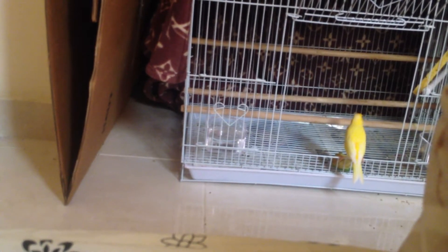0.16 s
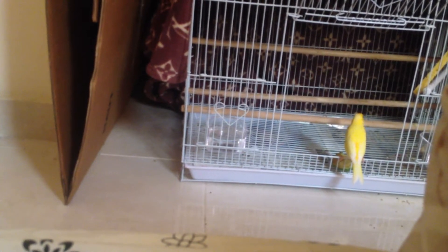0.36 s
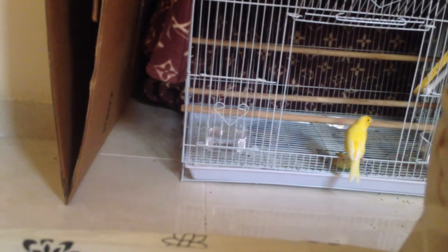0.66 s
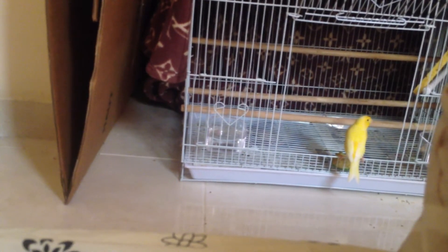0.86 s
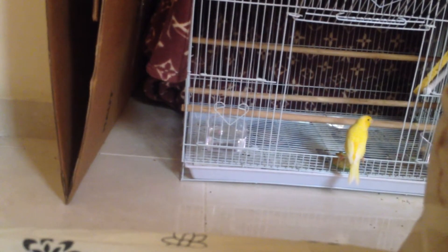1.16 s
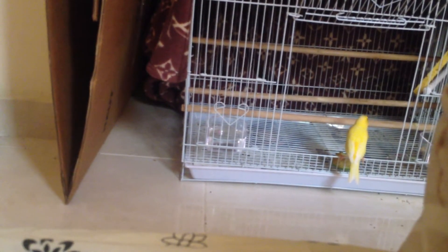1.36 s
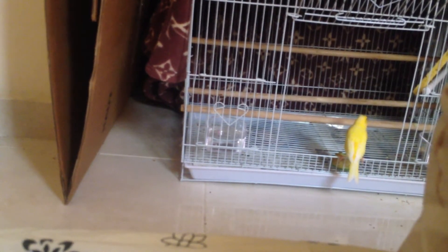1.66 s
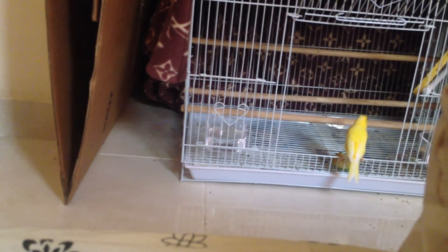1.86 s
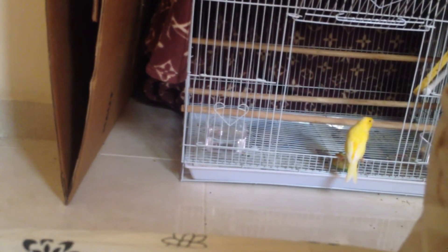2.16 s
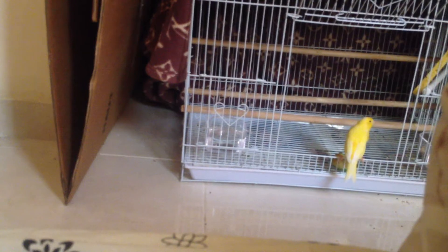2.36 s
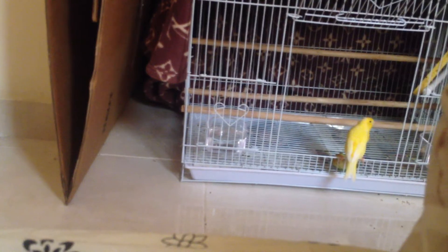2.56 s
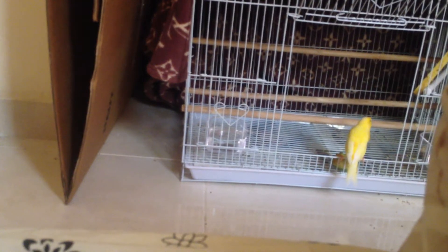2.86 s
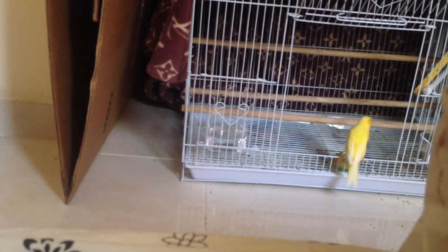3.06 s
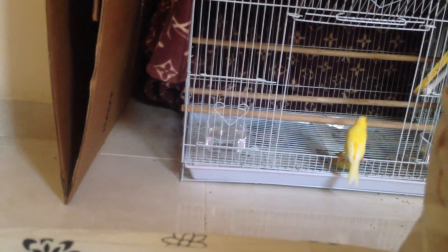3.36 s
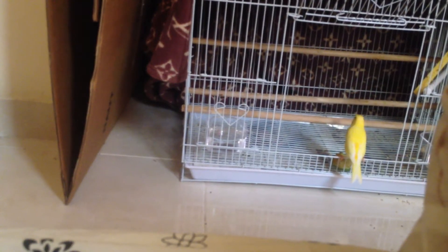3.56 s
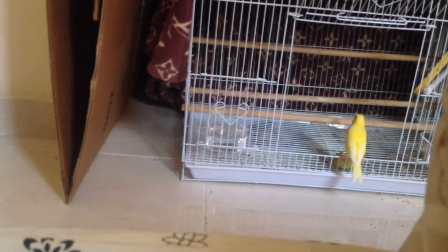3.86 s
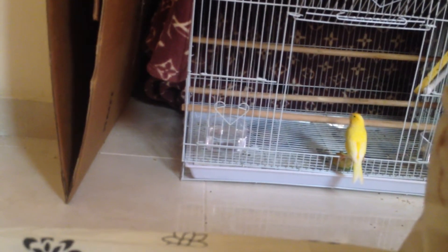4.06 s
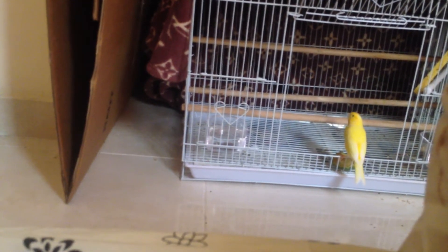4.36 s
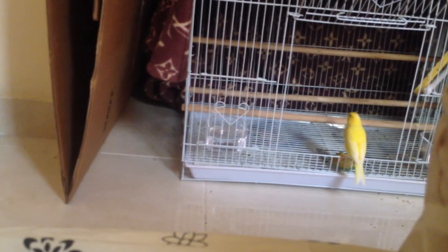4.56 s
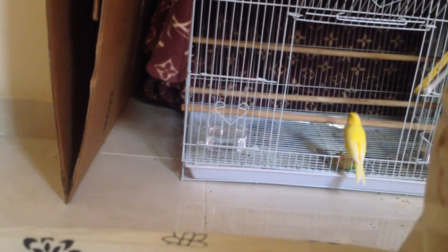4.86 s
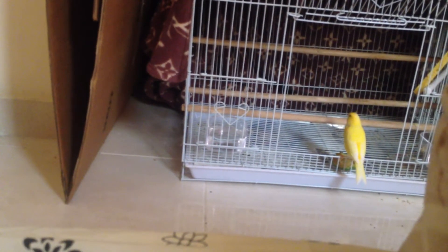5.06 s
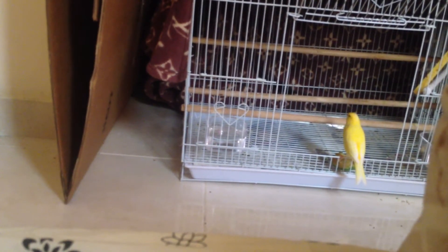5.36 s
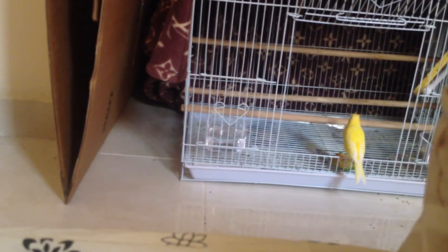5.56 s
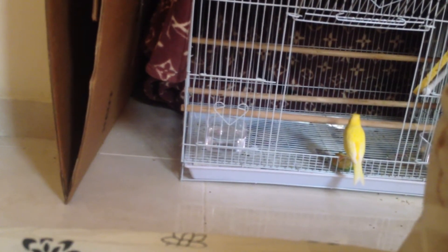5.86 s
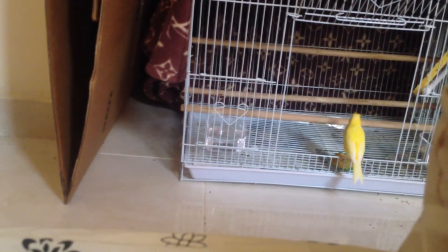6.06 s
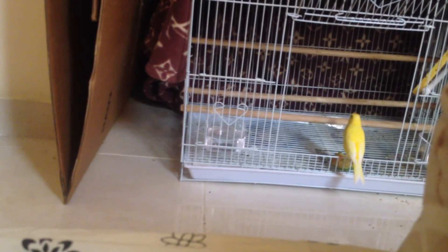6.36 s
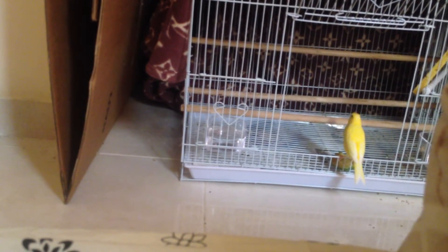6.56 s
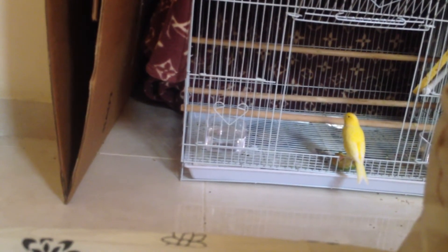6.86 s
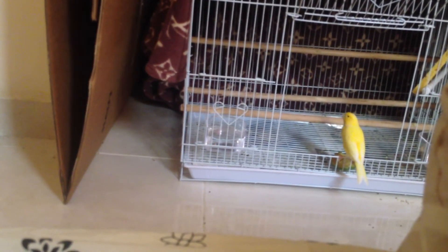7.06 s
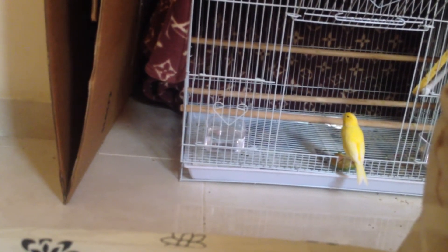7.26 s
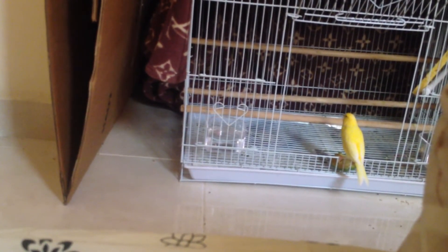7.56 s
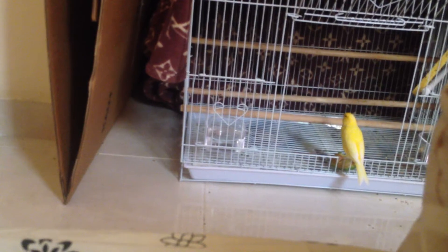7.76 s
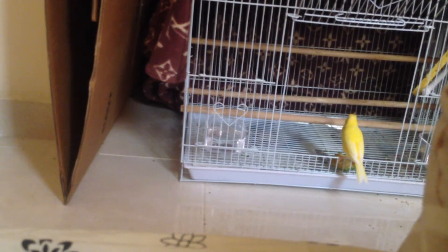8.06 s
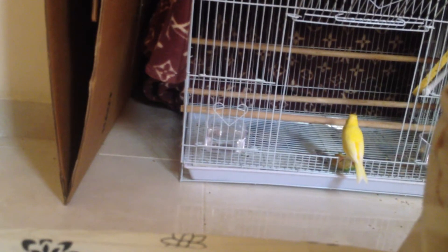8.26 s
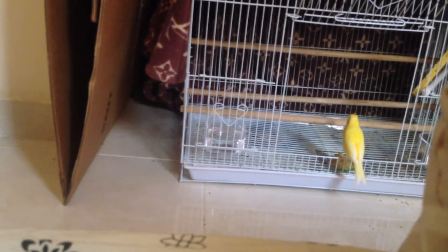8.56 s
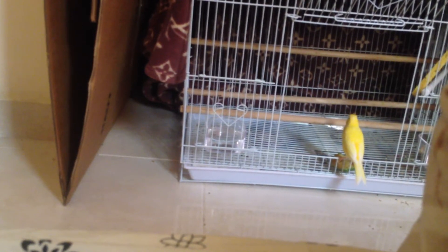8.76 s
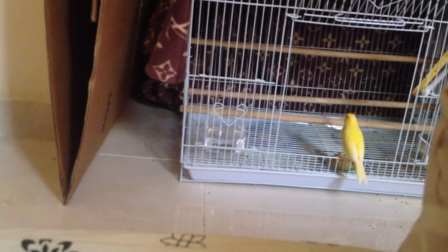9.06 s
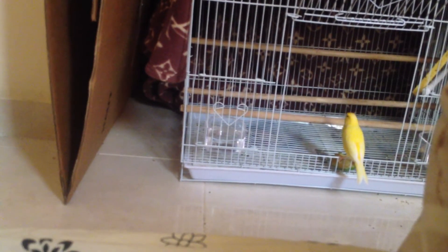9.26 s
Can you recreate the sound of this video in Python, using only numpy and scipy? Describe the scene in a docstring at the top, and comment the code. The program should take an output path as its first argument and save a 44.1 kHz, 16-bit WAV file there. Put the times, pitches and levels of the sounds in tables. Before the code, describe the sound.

A caged canary sings a long, rapid run of rattles, falling whistles and bright chirps in a small hard-walled, otherwise quiet room.

```python
"""A caged canary sings on a tiled floor a couple of metres from a phone, in a small hard-walled room.
Each note is a gliding whistle with faint overtones; the fast rattles repeat one steep falling glide.
Floor, cage, furniture and walls return a few single echoes, and filtered noise makes the dense tail.
Behind it lie soft room air in flickering noise bands, and a deep rumble and low hum of narrow-band noise."""
import sys
import numpy as np
from scipy import signal
from scipy.fft import rfft, irfft, next_fast_len
from scipy.io import wavfile
from scipy.ndimage import uniform_filter1d

SR = 44100
rng = np.random.default_rng(int(sys.argv[2]) if len(sys.argv) > 2 else 0)


def digitize_waveform(pressure):
    """Quantize a signal to 16-bit integers and store it at the path in sys.argv[1].

    Rows of a 2-D input are taken as channels; values are limited to [-1, 1].
    """
    field = np.atleast_2d(pressure).T
    bounded = np.clip(field, -1, 1)
    quanta = np.round(bounded * 32767).astype(np.int16)
    wavfile.write(sys.argv[1], SR, quanta)


N = 414981

# Room air, relative density: (frequency [Hz], level [dB per Hz])
AIR_SPECTRUM = [(18, -64), (30, -22.5), (66, -19.5), (177, 1.5), (256, -5), (315, -9), (1080, -14),
                (1190, -0.5), (1330, -6.5), (1470, -10.5), (2760, -19.5), (4300, -24), (5580, -26.5),
                (11300, -30.5), (15500, -24.5)]
# Low rumble of the house: (time [s], level near 100 Hz [dB], level near 170 Hz [dB])
HOUSE_RUMBLE = [(0, -84, -74), (1.75, -82.5, -76), (2.1, -78, -65), (2.6, -81, -71.5), (4.4, -80, -73),
                (4.8, -76.5, -65.5), (6.2, -76, -71), (7.4, -70.5, -80), (8.1, -72.5, -71.5),
                (9.41, -74.5, -76)]
# Note levels in the tables below are those at the bird, before flutter and room.
# Rattle strokes: (time [s], reference level [dB], reference pitch [Hz])
RATTLE_STROKES = [(0.0127, -32.4, 2827), (0.05, -37, 2595), (0.087, -34, 2860), (0.1267, -37, 2864),
                  (0.1611, -32.5, 2858), (0.2, -39, 2596), (0.2382, -34.5, 2850), (0.2776, -37.5, 2850),
                  (0.3126, -41.5, 2844), (3.317, -43, 2520), (3.35, -39, 2483), (3.3904, -36.5, 2636),
                  (3.425, -33.5, 2853), (3.4627, -33, 2850), (3.5005, -32.5, 2864), (3.5376, -35.5, 2860),
                  (3.5744, -30, 2837), (3.6114, -32, 2834), (3.6507, -34.5, 2858), (3.688, -34, 2840),
                  (3.727, -34, 2817), (3.7664, -40.5, 2594), (5.889, -49, 2087), (5.9198, -39, 3195),
                  (5.9616, -32, 2870), (6, -35, 2576), (6.036, -36, 2840), (6.072, -34, 2830),
                  (6.1107, -33.5, 2823), (6.1491, -34, 2824), (6.187, -32.5, 2794), (6.223, -37, 2826),
                  (6.261, -35, 2840), (6.2988, -34.5, 2847), (6.3376, -43, 2520), (6.376, -41, 2605),
                  (6.416, -40.5, 2620)]
# Shape of one stroke: (time from the stroke [s], multiple of its pitch [ratio], level against it [dB])
STROKE_SHAPE = [(-.0022, 1.45, -22.5), (-.0006, 1.16, -14), (.001, 1.06, -4.5), (.0029, .99, -1),
                (.005, .76, -5), (.0075, .52, -18.5), (0.0106, .32, -21)]
# Upward flicks: (time [s], pitch [Hz], peak level [dB])
FLICK_NOTES = [(0.7093, 4580, -29.5), (.987, 4800, -25.5)]
# Shape of a flick: (time after the start [s], multiple of its pitch [ratio], level against the peak [dB])
FLICK_SHAPE = [(0, 0.63, -26.5), (.004, 0.91, -7.5), (.008, .995, 0), (0.014, 1.005, -11),
               (.028, 1.03, -18)]
# Long soft arched whistles, one list each: (time [s], pitch [Hz], level [dB])
ARCH_NOTES = [
    [(0.74, 4810, -51), (.762, 5450, -54.5), (.8, 5830, -53), (.84, 5666, -51.5), (.892, 5580, -47),
     (.923, 5730, -49), (.953, 5720, -68)],
    [(1.0225, 5340, -54), (1.0515, 5770, -53), (1.0805, 5990, -48.5), (1.1385, 5700, -44),
     (1.1675, 5560, -62)],
]
# Short high pips: (time [s], length [s], from [Hz], to [Hz], start level [dB], end level [dB])
PIP_NOTES = [(1.216, 0.012, 6770, 6420, -40, -46), (1.246, 0.013, 6120, 6190, -42, -38.5),
             (1.335, .012, 6700, 6460, -47, -48), (1.454, .015, 6540, 6280, -44, -59),
             (1.56, 0.011, 6290, 5930, -36, -46), (1.661, .015, 6770, 6360, -56, -55),
             (1.769, .0235, 6500, 5760, -48.5, -54), (1.872, 0.018, 6190, 5200, -56, -51),
             (4.2515, 0.066, 5700, 5100, -51.5, -51), (4.53, 0.016, 5750, 5450, -42.5, -55),
             (5.098, 0.013, 5870, 5470, -67, -39), (5.357, 0.015, 6010, 5540, -64, -45),
             (6.6145, .012, 5600, 5330, -36.5, -53), (6.727, .014, 6350, 5830, -35.5, -43.5),
             (6.747, 0.038, 5780, 5460, -41.5, -42), (6.8395, 0.0096, 6430, 6300, -36.5, -47.5),
             (6.875, 0.014, 5650, 5440, -39, -40.5), (6.892, 0.0087, 5140, 5200, -38, -33),
             (6.947, 0.015, 6030, 5420, -45.5, -38.5)]
# Dips that fall and flatten: (time [s], length [s], from [Hz], to [Hz], peak level [dB],
# start against peak [dB], end against peak [dB], overtones [dB], place of the peak [share of length])
DIP_NOTES = [(1.256, 0.028, 6200, 4115, -26, -22, -4, 1.5, 0.54),
             (1.379, 0.019, 5730, 4160, -22, -24, -5, 2.5, .42),
             (1.492, .024, 5680, 4200, -25, -16, -9, 2, .48),
             (6.6295, 0.039, 5050, 4890, -37, -2, -20, -11, 0.47),
             (6.7832, 0.014, 5210, 4855, -26.5, -5, -15, 10, 0.42),
             (6.964, 0.022, 5360, 4910, -27, -19, -11, 11, .4),
             (7.038, .031, 5170, 4450, -30.5, 0, -6, 10, .45),
             (7.118, 0.034, 5030, 4340, -28.5, -2, -8.5, 6.5, 0.455),
             (7.1875, .027, 4810, 4353, -26, -5, -5, 6, .55),
             (7.254, 0.016, 4700, 4420, -26, -6, -4, 5, 0.43),
             (8.1403, 0.021, 4640, 4174, -31.5, -4.5, -18, 0.5, .6)]
# Falling sweeps with a final plunge: (time [s], length to the knee [s], from [Hz], knee [Hz],
# bend [exponent: under 1 hurries late, over 1 early], level [dB], plunge [s], end [Hz], plunge level [dB])
SWEEP_NOTES = [(1.601, .0167, 5150, 3490, 0.98, -25, 0.0035, 3030, -4.5),
               (1.7, .0193, 5100, 3050, 1, -26, 0.0025, 2100, -5),
               (1.7902, 0.026, 5800, 3790, 0.67, -26, 0.011, 3190, 1),
               (1.8897, 0.039, 5240, 3090, 1, -27, 0.0029, 1900, -3.5),
               (1.983, 0.034, 5910, 3140, 2.34, -28.5, 0.024, 2160, -9),
               (2.0768, 0.027, 4960, 3240, 2.4, -28.5, 0.012, 2030, -11),
               (2.154, 0.033, 5060, 2900, 1.56, -30.5, 0.008, 2200, -10),
               (2.2285, 0.033, 4870, 2730, 0.97, -27.5, 0.0038, 2040, -5),
               (2.304, 0.031, 4940, 2704, 1.05, -26.5, 0.0026, 1990, -3),
               (2.3772, 0.023, 4910, 2930, 0.79, -26.5, 0.0022, 2300, 0),
               (2.456, .0262, 4900, 2870, 0.9, -27.5, 0.0019, 2180, -1.5),
               (2.5298, 0.027, 5740, 3270, 1.2, -26, 0.0026, 2400, -6),
               (2.6073, 0.025, 5570, 2695, 1.26, -27.5, 0.0062, 1700, -3),
               (2.6824, 0.024, 5100, 2466, 1.28, -28.5, 0.0057, 1643, 5),
               (2.7612, 0.017, 5170, 2760, 1.8, -27, .0095, 1660, -2.5),
               (2.8314, 0.022, 5470, 2626, 1.47, -27.5, 0.0062, 1690, -1.5),
               (2.9103, 0.021, 4530, 2330, 1.77, -31.5, 0.0068, 1590, -3),
               (2.9912, 0.0083, 4100, 2920, 1.63, -34, 0.0083, 2450, -2)]
# Throat resonance in the sweeps: (pitch [Hz], level [dB])
SWEEP_THROAT = [(1600, -21), (2200, -15.5), (2800, -9.5), (3400, -3), (3750, -3.5), (4150, -1),
                (4600, -4.5), (5000, -14), (5700, -24.5), (6400, -14)]
# Slow glides that sink to a low tone, one list each: (time [s], pitch [Hz], effort [dB])
GLIDE_NOTES = [
    [(3.998, 5300, -41), (4.012, 4810, -23.5), (4.024, 4630, -33), (4.0369, 4460, -42),
     (4.0684, 3660, -29.5), (4.1, 2920, -33.5)],
    [(4.295, 5090, -34), (4.344, 4220, -28.5), (4.36, 3750, -27.5), (4.3906, 2665, -35.5),
     (4.406, 2720, -45), (4.4215, 2657, -62)],
    [(4.557, 5120, -31.5), (4.5885, 4690, -32.5), (4.62, 3624, -31), (4.667, 2810, -27),
     (4.6985, 2690, -36.5), (4.73, 2500, -42)],
    [(4.8375, 5300, -40), (4.853, 4650, -27), (4.884, 3680, -33.5), (4.931, 2668, -31.5),
     (4.962, 2632, -31.5), (5.0245, 2510, -54)],
    [(5.118, 5090, -32), (5.1486, 3870, -30), (5.179, 3060, -28.5), (5.21, 2725, -27.5),
     (5.24, 2608, -34.5), (5.271, 2604, -42)],
    [(5.373, 5370, -22), (5.389, 4630, -25.5), (5.42, 3530, -28), (5.436, 3506, -30), (5.468, 2800, -26.5),
     (5.4836, 2600, -27.5), (5.531, 2483, -42)],
    [(5.6515, 5720, -17), (5.668, 5020, -38), (5.7, 3800, -25), (5.713, 3520, -35), (5.722, 2950, -42),
     (5.7333, 2610, -39), (5.75, 2500, -36), (5.785, 2463, -33.5), (5.8315, 2490, -58)],
]
# Throat resonance in the glides: (pitch [Hz], level [dB])
GLIDE_THROAT = [(2650, -9), (2950, -11), (3350, -15), (3680, 1.5), (4150, -5.5), (4650, -0.5),
                (5100, -12.5), (5700, -18.5)]
# Rising hooks: (time [s], held pitch [Hz], level [dB], rise against it [dB], end against it [dB])
HOOK_NOTES = [(7.3085, 4490, -29, -31, 5), (7.371, 4373, -25.5, -23.5, 1), (7.4304, 4330, -27, -16, -11),
              (7.489, 4410, -35.5, -8, -1), (7.5512, 4430, -33.5, -18, -2.5), (7.6134, 4350, -42, 2, 2),
              (7.6795, 4440, -33, -10, -.6), (7.747, 4350, -25.5, -21.5, -1), (7.812, 4250, -29, -11, -6.5),
              (7.876, 4420, -33.5, -2.5, -2), (7.94, 4275, -32.5, -9.5, -1.5),
              (8.0052, 4210, -29.5, -21.5, -7), (8.068, 4195, -28.5, -18.5, -5.5)]
# Shape of a hook: (time after the start [s], multiple of the held pitch [ratio], level [dB],
# weight of the rise level [share], weight of the end level [share])
HOOK_SHAPE = [(0, .415, -7, .98, 0), (.003, .66, 0, .98, 0), (.0075, .905, 1, .25, 0),
              (.0115, .98, -2, 0, 0), (.025, 1.015, 0, 0, 1)]
# Low drops: (time [s], length [s], from [Hz], level [dB])
DROP_NOTES = [(8.1985, 0.022, 4070, -30), (8.26, 0.02, 4150, -32.5), (8.3242, .016, 4170, -33.5),
              (8.3866, 0.014, 4150, -31), (8.4467, 0.017, 4200, -30.5), (8.505, 0.015, 4290, -28),
              (8.566, 0.014, 4185, -30.5), (8.6238, 0.013, 4110, -32), (8.6864, .016, 4300, -31.5),
              (8.7438, 0.013, 4000, -30), (8.809, 0.019, 4210, -32.5), (8.8704, 0.014, 4900, -31.5)]
# Throat resonance in the drops: (pitch [Hz], level [dB])
DROP_THROAT = [(1400, -25.5), (1900, -18), (2400, -10), (2950, -1), (3350, -4), (3750, -1), (4200, -6.5),
               (4900, -7)]
# High falling chirps: (time [s], length [s], from [Hz], to [Hz], bend [exponent], level [dB])
CHIRP_NOTES = [(8.94, .011, 5260, 4200, 1.04, -36.5), (8.9992, 0.013, 6050, 3820, 1.1, -31),
               (9.054, 0.014, 5910, 4010, 0.44, -26.5), (9.111, 0.015, 6040, 4060, 1.1, -30.5),
               (9.1644, 0.015, 5960, 3210, .75, -27), (9.2174, 0.019, 5900, 3280, 0.87, -28),
               (9.281, 0.015, 5900, 3900, 1.18, -28.5), (9.341, 0.0095, 5860, 3920, .6, -30),
               (9.3946, 0.012, 5850, 4220, 0.72, -24.5)]
# Throat resonance in the chirps: (pitch [Hz], level [dB])
CHIRP_THROAT = [(3300, -23), (3900, -2.5), (4250, -.5), (4700, -1.5), (5250, -11.5), (6000, -27.5)]
# Added strength of the overtones: kind of note -> level [dB]
OVERTONES_DB = dict(flick=2.7, arch=-4, pip=6, sweep=2.5, glide=0.4, hook=2, drop=4.5, chirp=3)
# How windpipe and beak pass the overtones: (frequency [Hz], level [dB])
BEAK_RESPONSE = [(2000, 18), (4500, 13), (6500, -4), (9000, -2), (11000, -8), (13500, -2.5), (16000, -16)]
# First returns from floor, cage, furniture and walls: (delay [s], level against the direct sound [dB])
FIRST_ECHOES = [(.0013, -6), (.0045, -11), (.0066, -16), (.009, -17.5), (0.0102, -11.5), (0.016, -9),
                (0.017, -8.5), (0.0175, -17), (.0245, -13)]
# Dense tail by band: (frequency [Hz], time to fall 60 dB [s], energy against the direct sound [dB])
TAIL_BANDS = [(1530, 0.38, -3.5), (2730, 0.32, -8), (3500, 0.21, -9), (4500, 0.32, -9), (6100, 0.37, -14),
              (9000, 0.22, -1), (12700, 0.15, -13.5)]

AIR_DB, AIR_FLICKER_DB = -66.5, 0.46  # level above 300 Hz, spread of each band's flicker
SOURCE_OVERTONES_DB = (-31, -29.5, -27.5, -29)  # second to fifth, before beak and kind of note
EDGE_S = 0.003  # half the fade at each end of a note
WAVER, FLUTTER_DB, RASP = 0.0046, 1.5, 0.42  # spread of pitch [share], level, overtones [share]
STROKE_OVERTONES_DB, STROKE_ROUGH, PUFF_DB = 2, 0.14, -28  # roughness [share]; escaping air
DIP_FALLEN = 0.868  # share of the fall done at the loudest moment
# Late in the sweeps the favoured pitches slide down by this share each second
THROAT_SINKS_FROM_S, THROAT_SINKS_PER_S = 2.62, 0.56
DROP_TO_HZ, DROP_BEND = 1397, 1.6
SWAY_S, SWAY_RATE = 0.00008, 2.5  # spread of echo delay, drift steps per second
TAIL_START_S, TAIL_RISE_S = 0.0094, 0.0069
ROOM_GAIN_DB = -1  # on direct sound, echoes and tail together
TOP_HZ = 15500


def undb(db):
    """Decibels to gain."""
    return 10 ** (np.asarray(db) / 20)


def along(hz, table, column=1):
    """Reads a table on a log-frequency axis."""
    table = np.array(table, float)
    return np.interp(np.log(np.maximum(hz, 1)), np.log(table[:, 0]), table[:, column])


def unit(x):
    """Scales to rms 1."""
    return x / np.sqrt(np.mean(x ** 2))


def walk(rate):
    """Smooth random drift that changes about rate times a second; rms about 1."""
    step = int(SR / rate)
    stairs = np.repeat(rng.standard_normal(N // step + 1), step)
    smooth = uniform_filter1d(uniform_filter1d(stairs, step), step)
    return unit(smooth)[:N]


def band(hz, octaves, size=N):
    """Noise in a bell-shaped band on a log-frequency axis, rms about 1."""
    fast = next_fast_len(size)
    f = np.fft.rfftfreq(fast, 1 / SR) + 1  # keeps the logarithm finite
    bell = np.exp(-(np.log2(f / hz) / octaves) ** 2)
    return unit(irfft(rfft(rng.standard_normal(fast)) * bell, fast)[:size])


def air():
    """Room air as noise bands a third of an octave apart, each flickering alone, over the house rumble."""
    hiss = np.zeros(N)
    for hz in 45 * 2 ** np.arange(0, 8.6, 1 / 3):
        level_db = along(hz, AIR_SPECTRUM) + AIR_FLICKER_DB * walk(6)
        # the root turns level per Hz into level per band
        hiss += undb(level_db) * np.sqrt(hz) * band(hz, 0.33)
    above_rumble = irfft(rfft(hiss) * (np.fft.rfftfreq(N, 1 / SR) > 300), N)
    return hiss * undb(AIR_DB) / np.std(above_rumble) + house_rumble()


def house_rumble():
    """Deep rumble and low hum: two narrow noise bands whose levels drift slowly."""
    s, deep_db, hum_db = np.transpose(HOUSE_RUMBLE)
    t = np.arange(N) / SR
    deep = undb(np.interp(t, s, deep_db)) * band(104, 0.17)
    hum = undb(np.interp(t, s, hum_db)) * band(170, 0.1)
    return deep + hum


def add_whistle(out, note, waver, flutter, rasp):
    """One note: the membrane swings almost as a sine; windpipe and beak shape its faint overtones."""
    s, hz, db = np.transpose(note)
    s = np.maximum.accumulate(s)
    first = max(int((s[0] - EDGE_S) * SR), 0)
    last = min(int((s[-1] + EDGE_S) * SR), N)
    i = np.arange(first, last)
    t = i / SR
    pitch = np.interp(t, s, hz) * waver[i]
    phase = 2 * np.pi * np.cumsum(pitch) / SR
    tone = np.sin(phase)
    for k, source_db in enumerate(SOURCE_OVERTONES_DB, start=2):
        gain = rasp[i] * undb(source_db + along(k * pitch, BEAK_RESPONSE))
        tone += gain * (k * pitch < SR / 2) * np.sin(k * phase)
    to_edge = np.minimum(t - s[0] + EDGE_S, s[-1] + EDGE_S - t)
    edge = np.clip(to_edge / (2 * EDGE_S), 0, 1)
    out[i] += tone * flutter[i] * undb(np.interp(t, s, db)) * np.sin(np.pi / 2 * edge) ** 2


def shaped(shape, s, hz, db):
    """Places a note shape at a time, pitch and level."""
    return np.array(shape) * [1, hz, 1] + [s, 0, db]


def rattle(waver, flutter, rasp):
    """Fast strokes of one steep glide; the membrane flaps unevenly and air escapes with each."""
    strokes = np.zeros(N)
    for s, db, hz in RATTLE_STROKES:
        stroke = shaped(STROKE_SHAPE, s, hz, db)
        add_whistle(strokes, stroke, waver, flutter, rasp * undb(STROKE_OVERTONES_DB))
    breath = band(12300, 0.1) + 0.5 * band(6640, 0.091)
    puff = uniform_filter1d(np.abs(strokes), size=160) * breath
    return strokes * (1 + STROKE_ROUGH * walk(500)) + undb(PUFF_DB) * puff


def flicks():
    """Upward flicks: the pitch leaps, then creeps higher as the note fades."""
    for s, hz, db in FLICK_NOTES:
        yield shaped(FLICK_SHAPE, s, hz, db), OVERTONES_DB["flick"]


def arches():
    """Long soft whistles whose pitch arches along tabled points."""
    for points in ARCH_NOTES:
        yield points, OVERTONES_DB["arch"]


def pips():
    """Short high pips: straight glides in pitch and level."""
    for s, length, a, b, a_db, b_db in PIP_NOTES:
        yield [(s, a, a_db), (s + length, b, b_db)], OVERTONES_DB["pip"]


def dips():
    """Dips: most of the fall comes before the loudest moment, then the pitch flattens."""
    for s, length, a, b, db, a_db, b_db, over_db, at in DIP_NOTES:
        start = (s, a, db + a_db)
        peak = (s + at * length, a + DIP_FALLEN * (b - a), db)
        end = (s + length, b, db + b_db)
        yield [start, peak, end], over_db


def fall(s, length, from_hz, to_hz, bend, db, throat):
    """A falling note, loudest where its pitch meets the resonance of the throat."""
    share = np.linspace(0, 1, num=12)
    hz = from_hz + (to_hz - from_hz) * share
    return np.transpose([s + length * share ** bend, hz, db + along(hz, throat)])


def sweeps():
    """Falling sweeps that plunge at the end, through a throat resonance that sinks late on."""
    for s, length, a, knee, bend, db, plunge, end, plunge_db in SWEEP_NOTES:
        sunk = THROAT_SINKS_PER_S * max(s - THROAT_SINKS_FROM_S, 0)
        throat = np.array(SWEEP_THROAT) * [1 - sunk, 1]
        last = (s + length + plunge, end, db + along(end, throat) + plunge_db)
        yield np.vstack([fall(s, length, a, knee, bend, db, throat), last]), OVERTONES_DB["sweep"]


def glides():
    """Slow sinking glides; the throat favours some pitches, so loudness follows pitch and effort."""
    for points in GLIDE_NOTES:
        s, hz, effort_db = np.transpose(points)
        t = np.arange(s[0], s[-1], 0.004)
        pitch = np.interp(t, s, hz)
        level_db = np.interp(t, s, effort_db) + along(pitch, GLIDE_THROAT)
        yield np.transpose([t, pitch, level_db]), OVERTONES_DB["glide"]


def hooks():
    """Hooks: a steep rise into a nearly held pitch."""
    for s, hz, db, rise_db, end_db in HOOK_NOTES:
        points = [(s + at, hz * ratio, db + shape_db + rise * rise_db + end * end_db)
                  for at, ratio, shape_db, rise, end in HOOK_SHAPE]
        yield points, OVERTONES_DB["hook"]


def drops():
    """Low drops: falls to one low pitch, quick at first."""
    for s, length, hz, db in DROP_NOTES:
        yield fall(s, length, hz, DROP_TO_HZ, DROP_BEND, db, DROP_THROAT), OVERTONES_DB["drop"]


def chirps():
    """High chirps: short falls through the throat resonance."""
    for row in CHIRP_NOTES:
        yield fall(*row, CHIRP_THROAT), OVERTONES_DB["chirp"]


def canary():
    """The whole song; pitch and pressure tremble a little, the overtones rasp."""
    out = np.zeros(N)
    waver = 1 + WAVER * walk(150)
    flutter = undb(FLUTTER_DB * walk(120))
    rasp = 1 + RASP * walk(700)
    for kind in (flicks, arches, pips, dips, sweeps, glides, hooks, drops, chirps):
        for note, over_db in kind():
            add_whistle(out, note, waver, flutter, rasp * undb(over_db))
    return out + rattle(waver, flutter, rasp)


def tail():
    """A noise-like response that builds up and dies band by band."""
    size = SR // 2
    t = np.maximum(np.arange(size) / SR - TAIL_START_S, 0)
    response = np.zeros(size)
    for hz in 700 * 2 ** np.arange(0, 4.6, 0.5):
        fade = (1 - np.exp(-t / TAIL_RISE_S)) * undb(-60 * t / along(hz, TAIL_BANDS))
        noise = unit(fade * band(hz, 0.43, size))
        # each band carries energy in proportion to its width
        response += undb(along(hz, TAIL_BANDS, column=2)) * noise * np.sqrt(2 * hz / SR / size)
    return response


def room(x):
    """Direct sound, echoes on paths that drift as the head turns, and a tail that changes with the turn."""
    t = np.arange(N) / SR
    out = x.copy()
    for s, db in FIRST_ECHOES:
        out += undb(db) * np.interp(t - s - SWAY_S * walk(SWAY_RATE), t, x, left=0)
    turn = walk(SWAY_RATE)  # blends two separate tails
    for share in (np.cos(turn), np.sin(turn)):
        out += signal.fftconvolve(share * x, tail())[:N]
    return undb(ROOM_GAIN_DB) * out


def scene():
    """Bird in its room over the air."""
    return (room(canary()) + air())[None]


def record(dry):
    """The phone cuts the top: a steep low-pass."""
    low_pass = signal.ellip(10, 0.2, 60, TOP_HZ, fs=SR, output="sos")
    return signal.sosfilt(low_pass, dry)


dry = scene()
out = record(dry)
digitize_waveform(out)
```